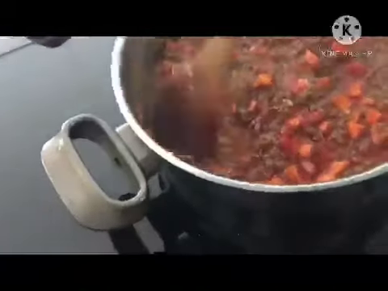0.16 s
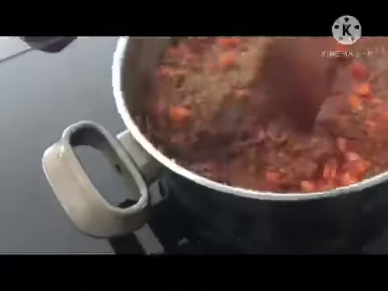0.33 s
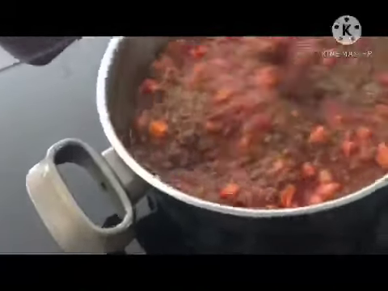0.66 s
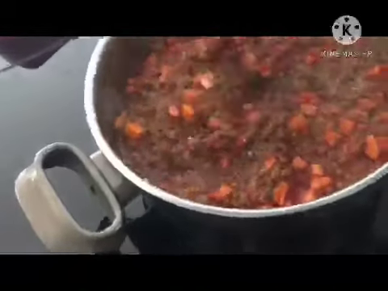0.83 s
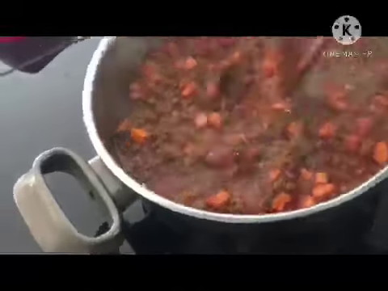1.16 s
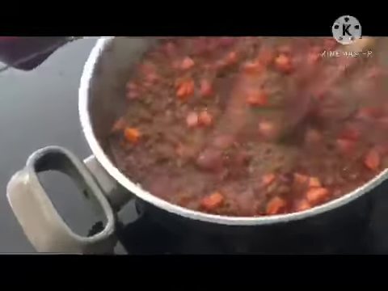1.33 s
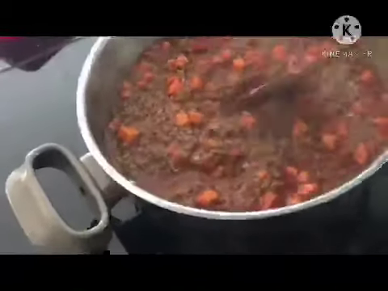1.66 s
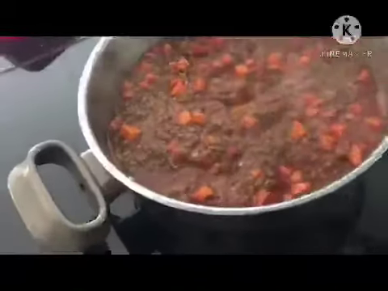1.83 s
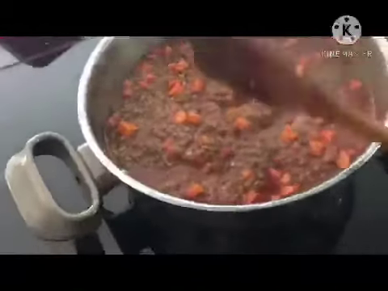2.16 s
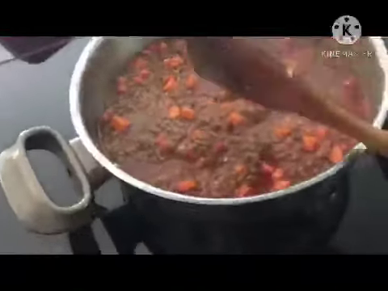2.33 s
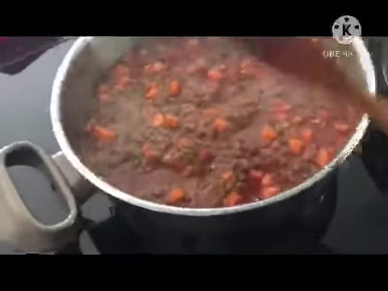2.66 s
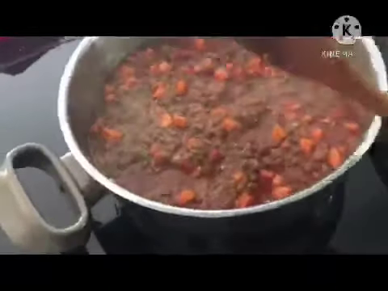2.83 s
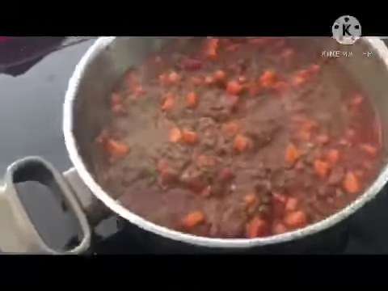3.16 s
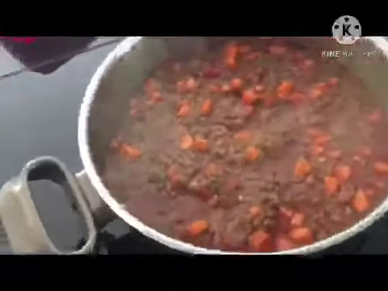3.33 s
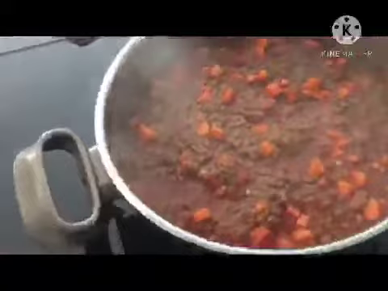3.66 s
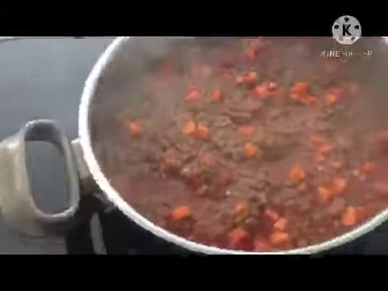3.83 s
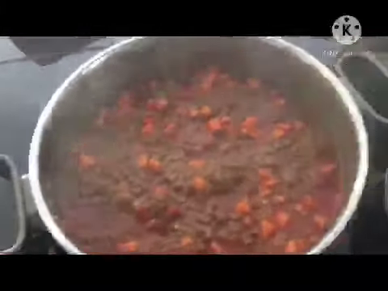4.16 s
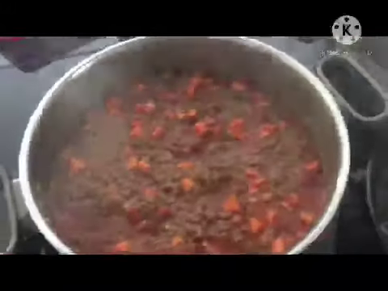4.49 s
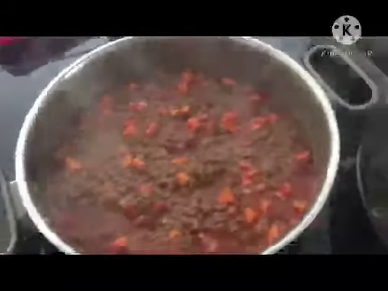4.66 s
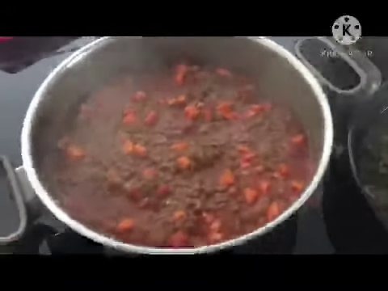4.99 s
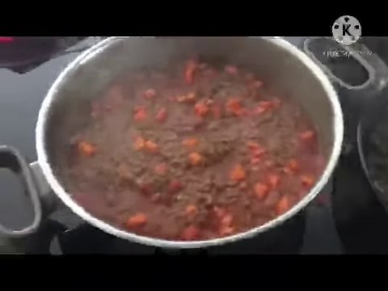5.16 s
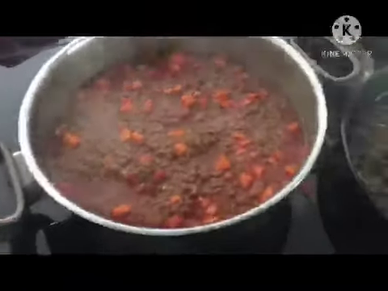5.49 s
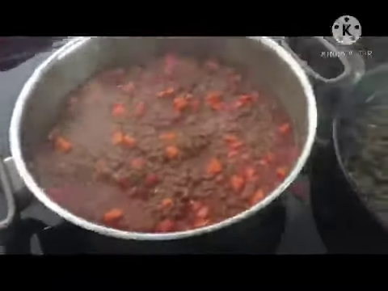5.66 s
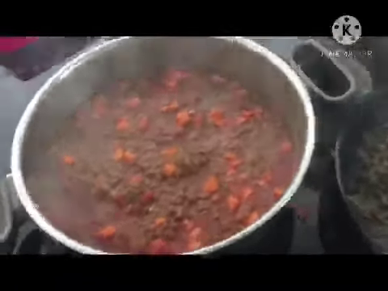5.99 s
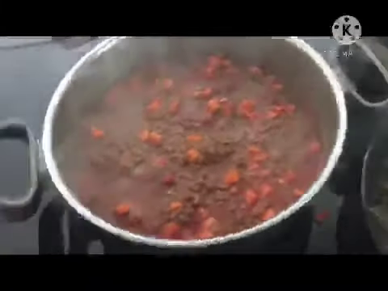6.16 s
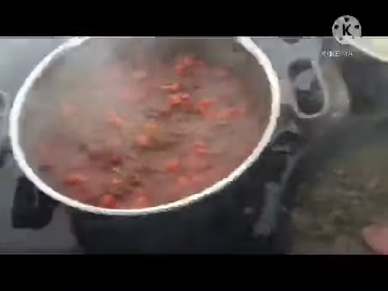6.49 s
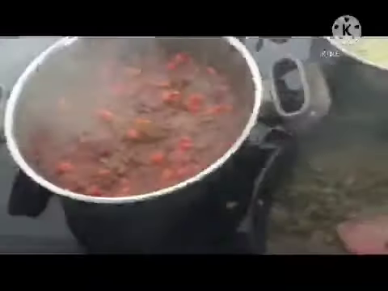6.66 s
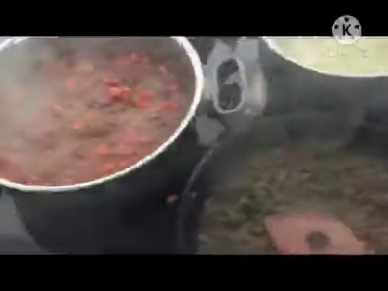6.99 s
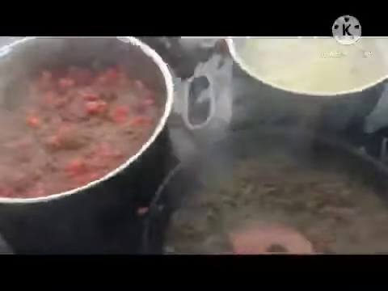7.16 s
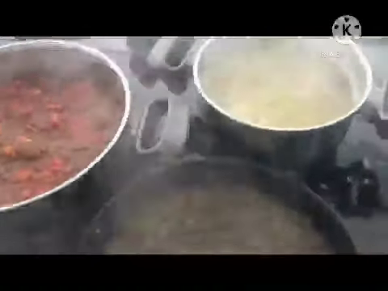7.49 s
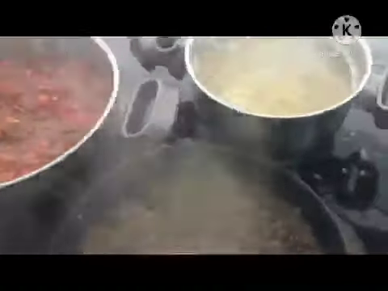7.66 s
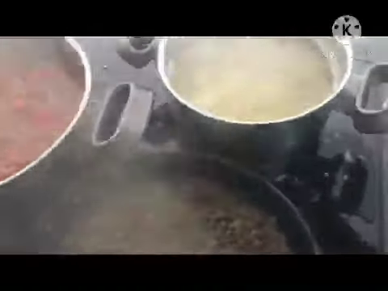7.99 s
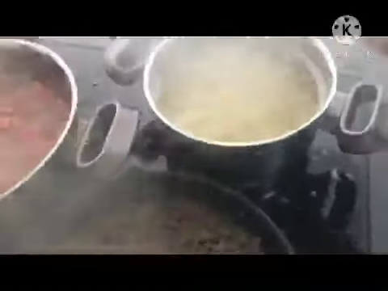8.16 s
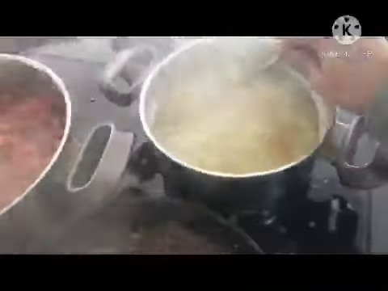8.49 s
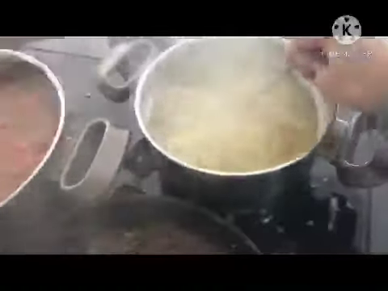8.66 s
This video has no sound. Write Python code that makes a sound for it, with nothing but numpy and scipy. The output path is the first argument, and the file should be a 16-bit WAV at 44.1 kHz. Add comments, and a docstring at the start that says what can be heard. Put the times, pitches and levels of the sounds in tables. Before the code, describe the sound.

Rough, overloaded low thumps from an induction hob flutter several times a second over constant simmer, sizzle and fan noise in a small kitchen. Five evenly spaced, hard woody raps on a full pot come early, each with a tiny bounce. The simmer's colour shifts as the microphone moves along the pots, the thuds thin out late, and a soft metal tink and scrape close it.

```python
"""A kitchen: thick sauce simmers on an induction hob under an extractor hood.
Surging coils leak into the microphone as low thuds, each led by a thin whistle; loud ones clip the input.
A wooden spoon knocks the pot rim five times: cracks of noise over ringing wood, rim and pot.
The background is shaped noise that dips after loud thuds, the rumble most.
At the end a steel spoon tinks on a second pot as damped modes and scrapes it as filtered noise."""
import sys
import numpy as np
from scipy import signal
from scipy.fft import rfft, irfft, next_fast_len
from scipy.io import wavfile
from scipy.ndimage import uniform_filter1d, minimum_filter1d

SR = 44100
rng = np.random.default_rng(int(sys.argv[2]) if len(sys.argv) > 2 else 0)


def to_wav(s):
    """Save 16-bit WAV."""
    ch = np.atleast_2d(s).T  # columns
    pcm = np.round(np.clip(ch, -1, 1) * 32767)  # PCM
    wavfile.write(sys.argv[1], SR, pcm.astype(np.int16))


N = 389395  # length in samples

# Coil surges, snapped to mains half-waves.
# Each row: start in seconds, length in seconds, drive of the first thud in dB, drive of the last in dB.
COIL_SURGES = [(0.15, 0.02, -12.5, -14), (0.21, 0.02, -4, -4.5), (0.33, 0.06, -17, -4),
               (0.41, 0.02, -26, -11), (0.53, 0.02, -3.5, -1.0), (0.55, 0.06, -23, 5.5),
               (0.61, 0.06, -3, 4), (0.77, 0.02, 2, 2.5), (0.79, 0.02, -15, -16), (0.81, 0.02, -5, -3.5),
               (0.85, 0.02, 1.5, 5), (0.97, 0.02, -1.5, -5.5), (1.01, 0.04, -0.5, -9.5),
               (1.05, 0.02, -32, -15), (1.17, 0.06, 2.5, -10), (1.23, 0.04, 4.0, 1.0),
               (1.37, 0.02, 1, -2.5), (1.39, 0.04, 6.5, -4.5), (1.45, 0.02, -8, -2.5),
               (1.57, 0.02, -13.5, -36), (1.63, 0.02, -41, -16.5), (1.77, 0.04, -22, -16),
               (1.83, 0.06, -3, -32), (2.01, 0.04, -26, -16), (2.07, 0.04, -35, -11), (2.21, 0.1, -17, -38),
               (2.41, 0.08, -15, -21), (2.61, 0.04, -5, -21), (2.65, 0.06, -37, 0), (2.83, 0.04, -6.5, -3),
               (2.87, 0.02, -30, -7), (2.89, 0.02, 3.5, -2.0), (3.03, 0.06, -4, -20),
               (3.09, 0.04, 0.5, 1.0), (3.13, 0.02, 2, -5), (3.25, 0.04, -17, -25), (3.29, 0.02, -9, -27),
               (3.33, 0.02, -1.5, -6.5), (3.45, 0.02, -5, -7), (3.47, 0.02, 0, -11), (3.49, 0.04, -1, 0),
               (3.53, 0.02, -21, -4.0), (3.65, 0.06, -5, -28.5), (3.81, 0.08, -34, -16.0),
               (3.91, 0.04, -10, -0.5), (4.09, 0.02, -2, 0.0), (4.11, 0.04, -29, -9),
               (4.29, 0.04, -13.5, 1.5), (4.33, 0.04, -3.5, -7.5), (4.37, 0.02, 4.0, 5),
               (4.49, 0.02, 4.5, 6), (4.53, 0.02, 1, 6), (4.57, 0.02, 1, 4), (4.73, 0.02, -20, -7),
               (4.89, 0.04, -5, -22), (4.95, 0.02, -14, -16), (5.09, 0.02, -9, -17),
               (5.13, 0.04, -7.5, -14.0), (5.17, 0.02, 1.0, 1.5), (5.29, 0.02, 3, 2.0),
               (5.33, 0.04, 1.5, -24), (5.49, 0.04, -15, -17), (5.61, 0.02, -24, -11.5),
               (5.73, 0.02, 2, -0.5), (5.93, 0.04, 8.5, -5), (5.99, 0.02, -1.5, 3), (6.01, 0.02, -13, -7.0),
               (6.13, 0.02, -18, -25), (6.19, 0.02, -30, -5), (6.21, 0.02, 4, -14), (6.33, 0.02, 0.5, -7.5),
               (6.41, 0.02, -1.5, -9), (6.53, 0.02, -11, -6.5), (6.57, 0.06, -11.5, -5),
               (6.73, 0.02, -19, 0.5), (6.77, 0.02, -10, -6), (6.79, 0.04, -14, -10),
               (6.97, 0.08, -4, -32.5), (7.37, 0.02, 5.5, 3), (7.39, 0.04, -2.5, -30.0),
               (7.45, 0.02, -22.0, -12.0), (7.57, 0.02, -9.5, -20), (7.61, 0.04, -8.0, -17),
               (7.65, 0.02, -2.0, -18), (7.81, 0.06, -21, -15), (7.97, 0.02, -2.5, -9),
               (8.01, 0.02, -4.5, -8.0), (8.07, 0.02, -31, -16.5), (8.21, 0.02, -13, -13),
               (8.25, 0.02, -11, -10), (8.29, 0.02, -6, -10), (8.41, 0.02, -22, -18),
               (8.49, 0.02, -18, -19), (8.61, 0.04, -39, -3), (8.67, 0.04, 0, -14)]
# Whistle level for a thud driven at 0 dB. Each row: time in seconds, level in dB.
WHISTLE_LEVEL = [(0, -26), (2.2, -26), (3, -21), (3.7, -27), (5.1, -24), (5.8, -22), (6.5, -29),
                 (8.83, -30)]
# Small ticks among the thuds. Each row: time in seconds, level in dB, pitch in Hz, fade (bell width) in seconds.
COIL_TICKS = [(.654, -31, 830, .0012), (.765, -27.5, 960, 0.0028), (.813, -31, 890, .0012),
              (.966, -25, 1180, 0.0023), (1.164, -20.5, 1070, 0.0022), (3.083, -34, 1740, 0.00072),
              (3.113, -26, 870, 0.0013), (3.445, -24, 1000, 0.0026), (4.366, -10, 1460, .00025),
              (4.486, -23, 900, 0.0018), (5.29, -27, 900, 0.0034), (5.323, -26.5, 1450, .001),
              (5.922, -26.5, 960, 0.0037)]

# Wooden spoon on the rim. Each row: time in seconds, knock strength in dB, then trims in dB for the
# pot's boom, the ringing rim and the bounce, all relative to that strength.
SPOON_KNOCKS = [(2.029, 0.5, -10, -14, -5.5), (2.227, -0.5, -10.5, -13.5, -10), (2.427, -1, -10, -18, -8.5),
                (2.638, -1, -12.5, -14, -8), (2.82, -3, -11, -14, -10)]
# Colour of the knock's crack. Each row: frequency in Hz, relative density in dB per Hz.
CRACK_SPECTRUM = [(180, -19), (400, -1.5), (1000, -8), (1290, -7.5), (2470, -14.5), (3400, -12.5),
                  (4800, -23.5), (6350, -22.5), (9000, -29), (13000, -32.5), (15800, -41)]
# Modes of the full pot. Each row: frequency in Hz, relative level in dB, 60 dB decay in seconds.
POT_MODES = [(162.1, -0.6, .17), (221, -8, 0.15), (269, -1.5, 0.1), (304, -10, 0.08), (355, -10, 0.061),
             (398, -9, 0.081), (503, -15, 0.11), (612, -17.5, 0.12), (830, -19, .07)]
# Modes of the wood. Each row: frequency in Hz, relative level in dB, 60 dB decay in seconds.
WOOD_MODES = [(1000, -7, .03), (1180, -1, .032), (1260, 1, .034), (1450, -7, .028), (1780, -4, .032),
              (1870, -4, .032), (2200, -8, .028), (3500, -13, .02)]
# Modes of the rim. Each row: frequency in Hz, relative level in dB, 60 dB decay in seconds.
RIM_MODES = [(5450, -1, .016), (5780, 1, .016), (6100, -1, .016), (6400, -3, .016), (6860, -4, .015),
             (7400, -7, .013)]

# Steel spoon contact. Each row: time in seconds, strength in dB, lead pitch in Hz.
STEEL_TINKS = [(8.4506, -25.5, 7940)]
# Steel spoon scraping. Each row: time in seconds, rasp level in dB, squeak level in dB.
STEEL_SCRAPE = [(8.46, -69, -78), (8.51, -45, -58), (8.57, -36, -52), (8.61, -45, -39), (8.66, -46, -85),
                (8.72, -82, -90)]

# Simmer and hood before any dip. Each row: time in seconds, rush level in dB, rumble level in dB.
KITCHEN_LEVELS = [(0.0, -33.5, -28), (0.42, -32, -25), (0.69, -33.5, -27), (1.6, -32.5, -26.5),
                  (1.79, -31.5, -25), (2.16, -32, -26.5), (2.78, -33, -26), (2.9, -32.5, -29),
                  (3.1, -33, -26.5), (3.98, -32.5, -25.5), (4.77, -32.5, -26.5), (4.97, -32, -25),
                  (5.65, -31.5, -26.5), (6.03, -32, -25.5), (7.21, -32, -27), (7.35, -32.5, -27),
                  (8.58, -32.5, -27.5), (8.83, -31.5, -23.5)]
# Colour of the hood rumble. Each row: frequency in Hz, relative density in dB per Hz.
RUMBLE_SPECTRUM = [(30, -22), (60, -2.5), (130, -4.5), (220, 0), (290, -2.5), (400, -10.5), (520, -15.5),
                   (800, -56)]
# Colour of the pots' rush before the lifts. Each row: frequency in Hz, relative density in dB per Hz.
RUSH_SPECTRUM = [(280, -53), (480, -11), (560, -3.5), (780, -6.5), (1020, -10.5), (1500, -9.5),
                 (2200, -12.5), (3500, -14.5), (4800, -22.5), (6000, -57)]
# Colour of the fizzing bubbles. Each row: frequency in Hz, relative density in dB per Hz.
SIZZLE_SPECTRUM = [(3500, -42), (5000, -2), (6000, -1.4), (8000, -5.5), (9800, -6), (10500, -11.5),
                   (12000, -9), (14500, -14), (15900, -12)]
# Air in and around the pots lifts the rush; one list for each of three places along the hob.
# Each row: centre in Hz, width in Hz, lift in dB.
PLACE_LIFTS = [
    [(604, 110, 4.5), (710, 90, 7), (1263, 114, 7.5), (1440, 110, 2.5), (1870, 180, 4), (2510, 140, 5.5),
     (3100, 81, 4), (3710, 130, 2), (4350, 230, 4.5)],
    [(640, 260, 10), (1140, 160, 9), (1765, 220, 8), (2180, 100, 7), (2460, 130, 5), (2900, 150, 1),
     (3200, 120, 4), (4400, 200, 6.5)],
    [(675, 350, 7.5), (1226, 120, 6.5), (1468, 150, 10), (1990, 250, 9.5), (2600, 180, 10), (3190, 120, 6),
     (3800, 200, 4), (4200, 200, 5)],
]
# The microphone moves along the hob. Each row: time in seconds, place from 0 to 2.
MIC_PATH = [(0, 0.0059), (6.1, 0.034), (6.9, 1), (7.3, 1.13), (7.8, 1.8), (8.83, 1.74)]
# Decay of the room. Each row: frequency in Hz, 60 dB decay in seconds.
ROOM_DECAY = [(200, .3), (2000, 0.58), (5000, .12), (10000, .09)]

MAINS_HZ, MAINS_PHASE_S = 50.0075, 0.0002
WHISTLE_HZ = 15450  # centre pitch, scattered from blip to blip
WHISTLE_FOLLOWS, SECOND_HALF_DB = 0.57, 0.5  # dB per thud dB; lift on every second half-wave of a surge
SIZZLE_DB = -11.5  # relative to the rush
DIP_FROM_DB, DIP_HOLD_S, DIP_RECOVER_S = -1.5, 0.14, 0.18  # soft threshold, peak hold, fade time constant
# dB lost per dB over: at once in the rumble, at once in rush and sizzle, slowly in all
RUMBLE_DIP, RUSH_DIP, SLOW_DIP = 0.77, 0.13, 0.14
TOP_HZ, EDGE_HZ = 15800, 120  # upper band limit and the width of its slope


def hob(lead_s=0.0034):
    """Each mains half-wave of a surge leaks one hump of field, led by one whistle blip."""
    thuds, whistle = np.zeros(N), np.zeros(N)
    t = np.arange(-SR // 80, SR // 80) / SR
    # the field sags while the coil whistles
    hump = 1.15 * bell(t + 0.00021, 0.0028, 0.0015) - 0.69 * bell(t + 0.0031, 0.0012, 0.0012)
    chance = rng.standard_normal((len(COIL_SURGES), 12, 5))
    level_db, = curves(WHISTLE_LEVEL)
    for (s, length, first_db, last_db), draws in zip(COIL_SURGES, chance):
        start = round(2 * MAINS_HZ * s)
        count = round(2 * MAINS_HZ * length)
        for k, db in enumerate(np.linspace(first_db, last_db, count)):
            size, pitch, turn, ripple, twist = draws[k]
            at = MAINS_PHASE_S + (start + k) / (2 * MAINS_HZ) + t[0]

            # a faint random wobble makes no two humps alike
            wobble_hz = 275 * np.exp(0.16 * ripple)
            wobble = np.sin(2 * np.pi * wobble_hz * t + 9 * twist)
            uneven = amp(-21.5) * bell(t + 0.0022, 0.0017, 0.0036) * wobble
            add(thuds, at, amp(db) * (hump + uneven))

            tone = np.sin(2 * np.pi * (WHISTLE_HZ + 140 * pitch) * t + 9 * turn)
            whistle_db = level_db[round(s * SR)] + WHISTLE_FOLLOWS * db + SECOND_HALF_DB * (k % 2)
            blip = amp(whistle_db + 3.8 * size) * bell(t, 0.0017, 0.0011) * tone
            add(whistle, at - lead_s, blip)
    for s, db, hz, fade_s in COIL_TICKS:
        tick = amp(db) * bell(t, 0.000098, fade_s) * np.cos(2 * np.pi * hz * t)
        add(thuds, s + t[0] + 0.001, tick)
    return thuds + whistle


def wooden_spoon(bounce_s=0.0075, lag_s=0.0006):
    """Each knock cracks, rings wood, rim and full pot, and bounces once as a second crack of noise."""
    out, t = np.zeros(N), np.arange(SR // 3) / SR
    for s, db, boom_db, rim_db, bounce_db in SPOON_KNOCKS:
        for delay, size_db in ((0, db - 11), (bounce_s, db + bounce_db)):
            colour = lambda f: amp(along(CRACK_SPECTRUM, f))
            crack = unit(filtered(rng.standard_normal(len(t)), colour)) * amp(-60 * t / 0.043)
            add(out, s + lag_s + delay, amp(size_db) * crack)
        # the heavy pot starts slowly, the wood sooner and the rim soonest
        boom = amp(boom_db + 7) * (1 - np.exp(-t / 0.002)) * ring(POT_MODES, t, scatter_db=2.3)
        wood = amp(-5) * (1 - np.exp(-t / 0.001)) * ring(WOOD_MODES, t, scatter_db=2)
        rim = amp(rim_db + 6.5) * (1 - np.exp(-t / 0.00051)) * ring(RIM_MODES, t, scatter_db=3)
        add(out, s + lag_s, amp(db) * (boom + wood + rim))
    return out


def steel_spoon():
    """Contact rings three short modes; scraping is a broad rasp of noise with a narrow squeak."""
    rasp_db, squeak_db = curves(STEEL_SCRAPE)
    rasp = unit(filtered(rng.standard_normal(N), lambda f: 1 / (1 + ((f - 4000) / 4500) ** 2)))
    squeak = unit(filtered(rng.standard_normal(N), lambda f: 1 / (1 + ((f - 7300) / 90) ** 2)))
    out = amp(rasp_db) * rasp + amp(squeak_db) * squeak
    t = np.arange(SR // 10) / SR
    for s, db, hz in STEEL_TINKS:
        modes = [(hz, db - 0.5, 0.025), (0.95 * hz, db - 6, 0.025), (1.62 * hz, db - 19, 0.02)]
        add(out, s, ring(modes, t, scatter_db=0))
    return out


def simmer(coils):
    """Hood rumble, rush of the pots and fizz of tiny bubbles, as noise that dips after loud thuds."""
    rush_db, rumble_db = curves(KITCHEN_LEVELS)
    held_db, slow_db = dip(coils)
    place, = curves(MIC_PATH)
    rush = np.zeros(N)
    for k, lifts in enumerate(PLACE_LIFTS):
        nearness = np.sqrt(np.clip(1 - np.abs(place - k), 0, 1))  # equal-power crossfade
        rush += nearness * noise(RUSH_SPECTRUM, 1.5, lifts)
    sizzle = amp(SIZZLE_DB) * noise(SIZZLE_SPECTRUM, patchy_db=1.6)
    rumble = amp(rumble_db - RUMBLE_DIP * held_db) * noise(RUMBLE_SPECTRUM, patchy_db=1.5)
    pots = amp(rush_db - RUSH_DIP * held_db) * (rush + sizzle)
    return amp(-SLOW_DIP * slow_db) * (rumble + pots)


def dip(loud):
    """Softly counted dB over the threshold: recent peaks held a moment, and remembered with a slow fade."""
    hold = round(DIP_HOLD_S * SR)
    peak = -minimum_filter1d(-np.abs(loud), hold, origin=(hold - 1) // 2)
    held = uniform_filter1d(20 * np.log10(1 + peak / amp(DIP_FROM_DB)), SR // 40)
    fade = 1 / (DIP_RECOVER_S * SR)
    return held, signal.lfilter([fade], [1, fade - 1], held)


def room(x):
    """Echo through a fresh noise tail in which each frequency dies at its own speed."""
    hz, t, z = signal.stft(rng.standard_normal(SR // 2), SR, nperseg=256)
    decay = amp(-60 * t / along(ROOM_DECAY, hz)[:, None])
    tail = signal.istft(z * decay, SR, nperseg=256)[1]
    delayed = np.pad(x, (300, 0))  # samples before the echo begins
    return signal.fftconvolve(delayed, tail / np.linalg.norm(tail))[:N]


def noise(spectrum, patchy_db, lifts=()):
    """Noise of rms 1 with patches of random gain and resonant lifts."""
    z = signal.stft(rng.standard_normal(N + 512), nperseg=512)[2]
    patches = uniform_filter1d(rng.standard_normal(z.shape), 6, 0)  # smooth across frequency
    patches = uniform_filter1d(patches, 8, 1)  # then across time
    x = signal.istft(z * amp(patchy_db * unit(patches)), nperseg=512)[1][:N]
    lift = lambda f: sum(db / (1 + (2 * (f - hz) / width) ** 2) for hz, width, db in lifts)
    return unit(filtered(x, lambda f: amp(along(spectrum, f) + lift(f))))


def ring(modes, t, scatter_db):
    """Sum of damped sine modes, each struck at a randomly scattered strength."""
    out = np.zeros(len(t))
    for hz, db, t60 in modes:
        out += amp(db + rng.normal(0, scatter_db) - 60 * t / t60) * np.sin(2 * np.pi * hz * t)
    return out


def bell(t, rise, fall):
    """A smooth hump that peaks at t = 0, with Gaussian widths in seconds on either side."""
    return np.exp(-(t / np.where(t < 0, rise, fall)) ** 2 / 2)


def filtered(x, response):
    """x shaped by a gain for each frequency."""
    m = next_fast_len(len(x) + 8192)
    return irfft(rfft(x, m) * response(np.fft.rfftfreq(m, 1 / SR)), m)[:len(x)]


def along(points, hz):
    """Value at hz between (Hz, value) points on a log axis."""
    f, v = np.transpose(points)
    return np.interp(np.log(hz + 1), np.log(f + 1), v)


def curves(rows):
    """One value per sample for each column after the time."""
    s, *cols = np.transpose(rows)
    return [np.interp(np.arange(N) / SR, s, c) for c in cols]


def amp(db):
    """Gain of a level in dB."""
    return 10 ** (np.asarray(db) / 20)


def unit(x):
    """x at rms 1."""
    return x / np.sqrt(np.mean(x ** 2) + 1e-20)


def add(track, s, sound):
    """Mixes a sound into the track at time s."""
    part = track[round(s * SR):][:len(sound)]
    part += sound[:len(part)]


def scene():
    """All sources at one microphone; the room answers each knock a little differently."""
    knocks, coils = wooden_spoon(), hob()
    latest = np.searchsorted([row[0] for row in SPOON_KNOCKS], np.arange(N) / SR)  # knocks begun so far
    echoes = sum(room(knocks * (latest == k + 1)) for k in range(len(SPOON_KNOCKS)))
    mix = coils + simmer(coils) + knocks + amp(-14) * echoes + steel_spoon()
    return mix[None]


def record(dry, low_hz=56, knee=25):
    """A steep bass cut turns each hump into a swing; the input clips; the treble is cut off at the top."""
    x = signal.sosfilt(signal.butter(N=4, Wn=low_hz, btype="high", fs=SR, output="sos"), dry[0])
    x = x / (1 + np.abs(x) ** knee) ** (1 / knee)  # a high knee clips almost squarely
    return filtered(x, lambda f: np.clip(0.5 + (TOP_HZ - f) / EDGE_HZ, 0, 1) ** 2)[None]


dry = scene()
out = record(dry)
to_wav(out)
```